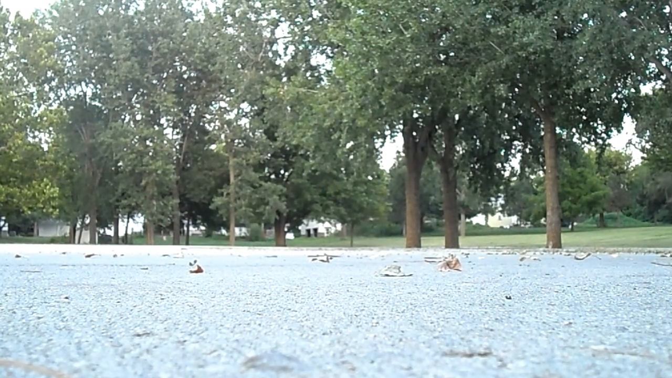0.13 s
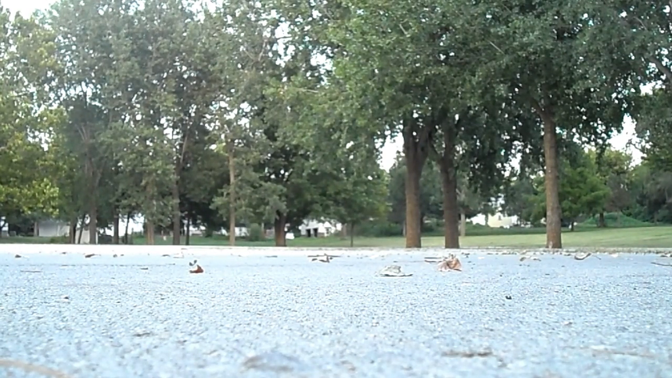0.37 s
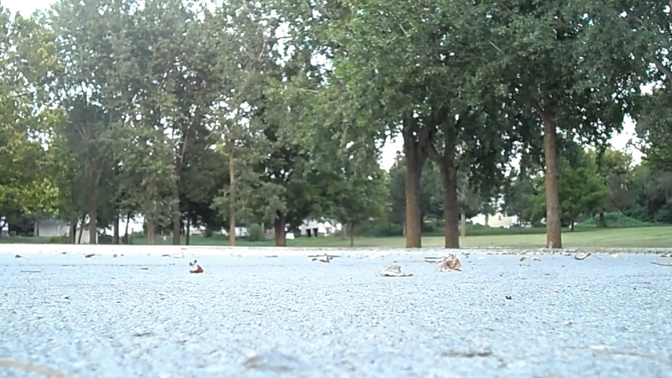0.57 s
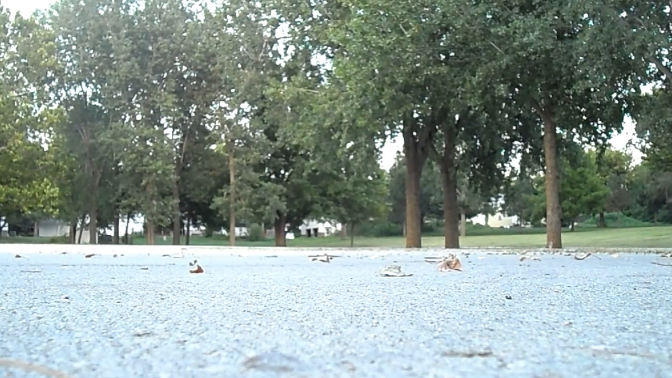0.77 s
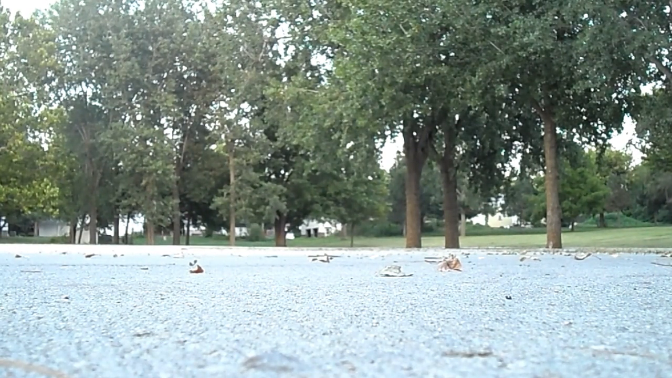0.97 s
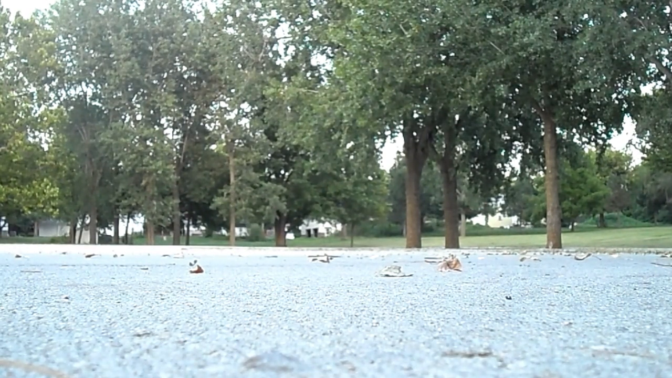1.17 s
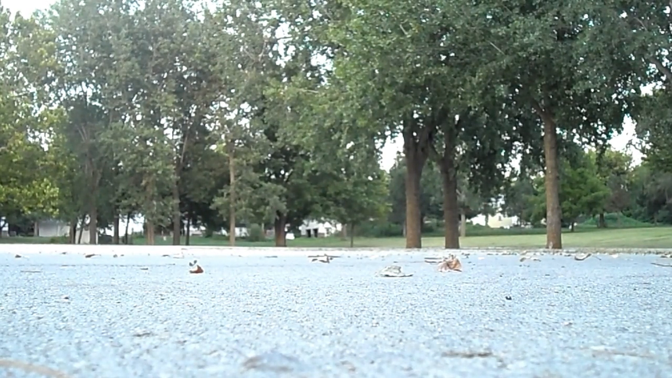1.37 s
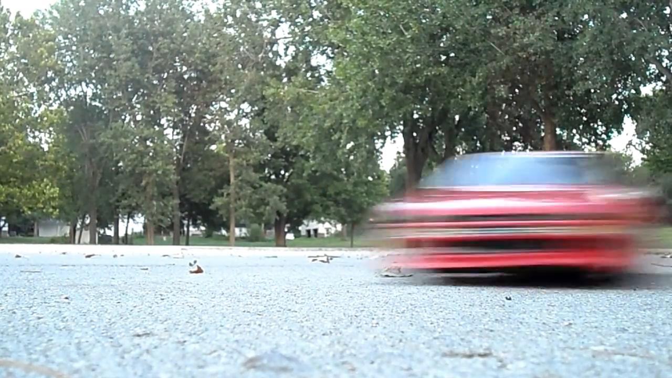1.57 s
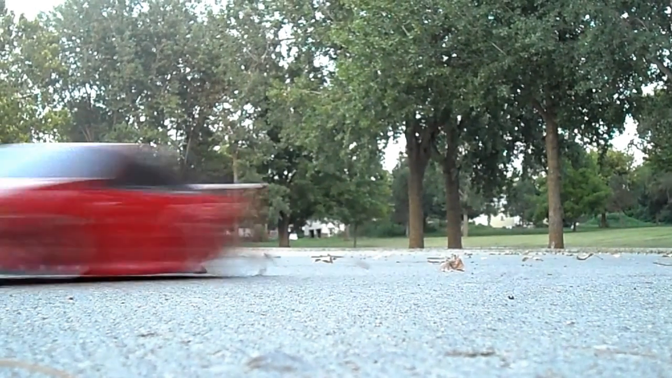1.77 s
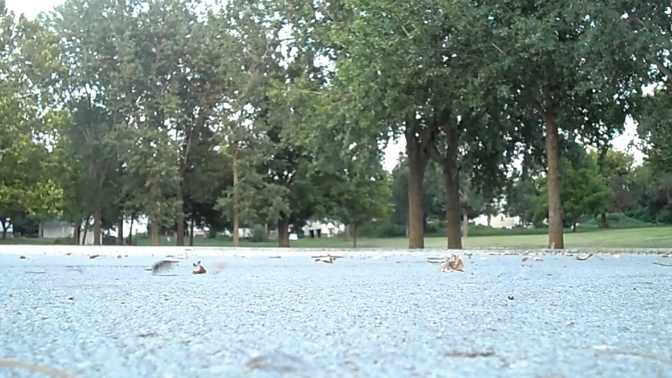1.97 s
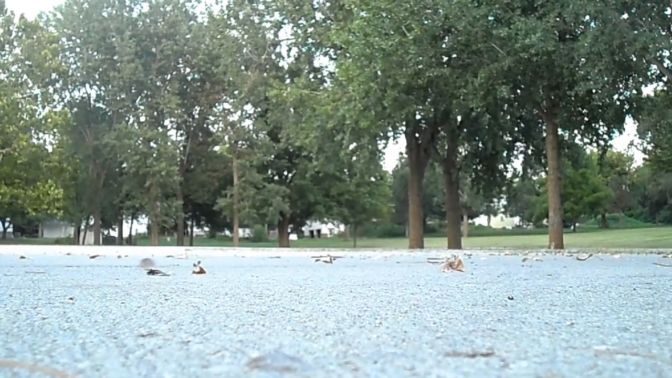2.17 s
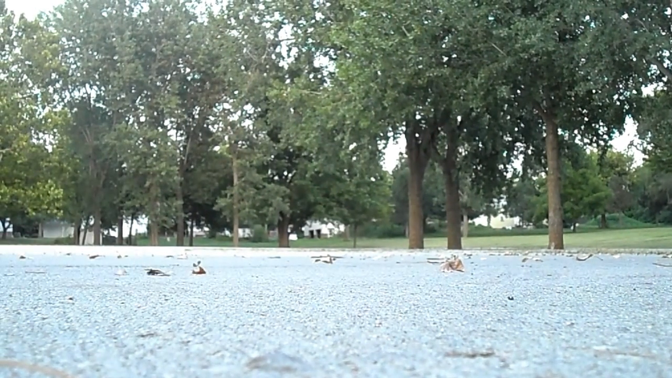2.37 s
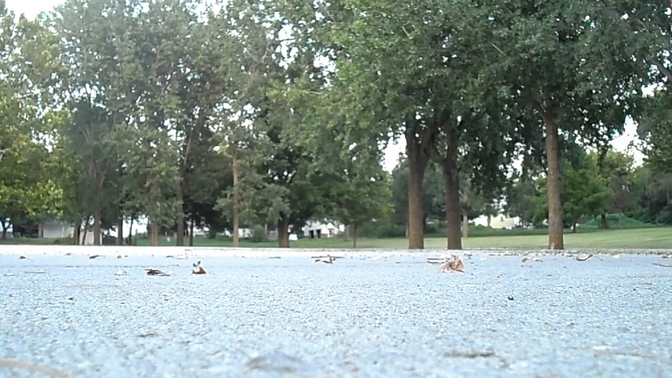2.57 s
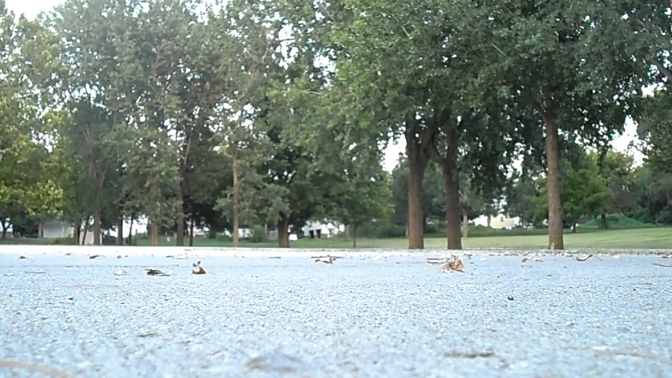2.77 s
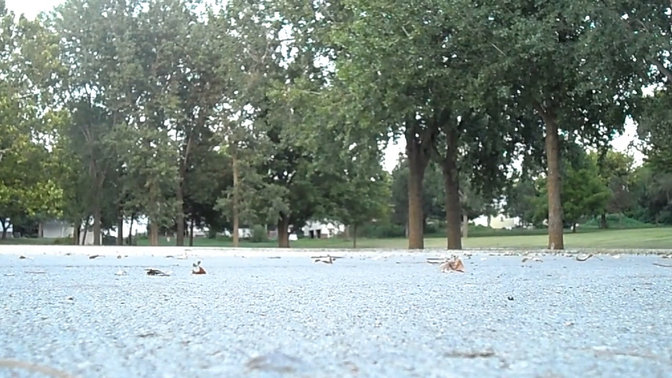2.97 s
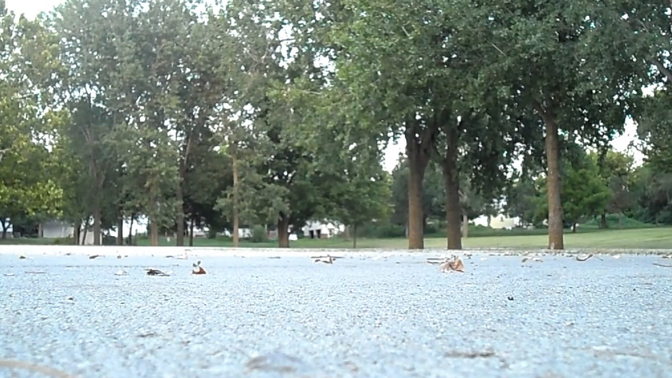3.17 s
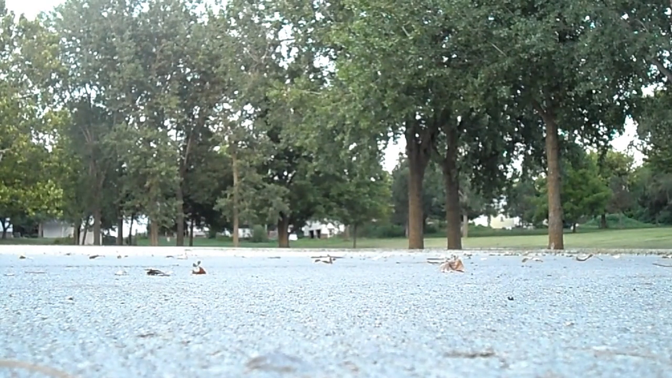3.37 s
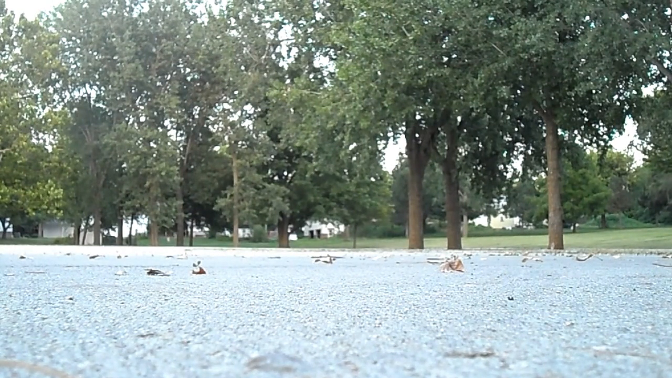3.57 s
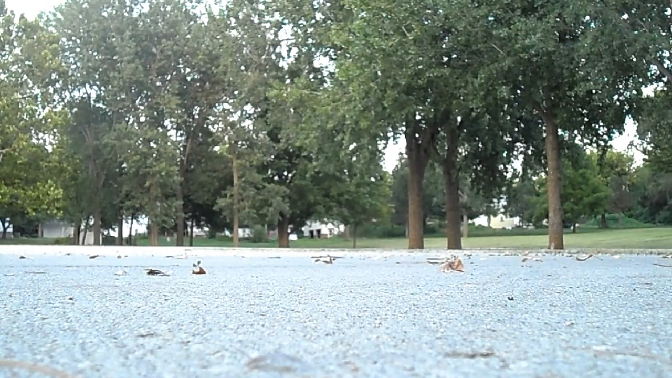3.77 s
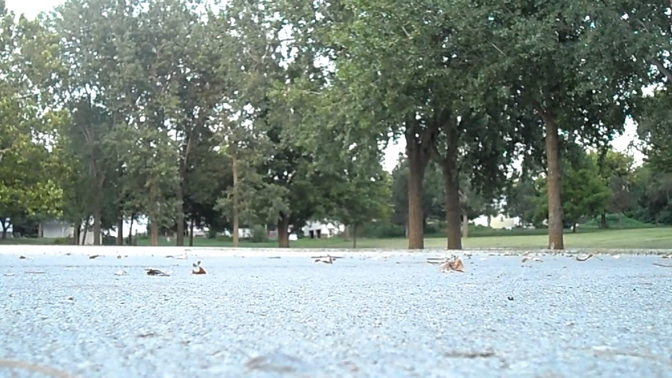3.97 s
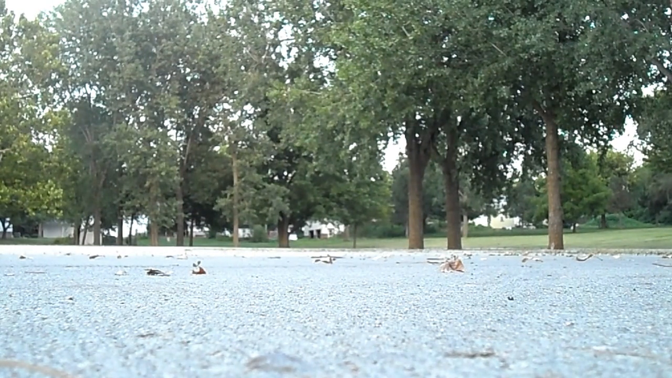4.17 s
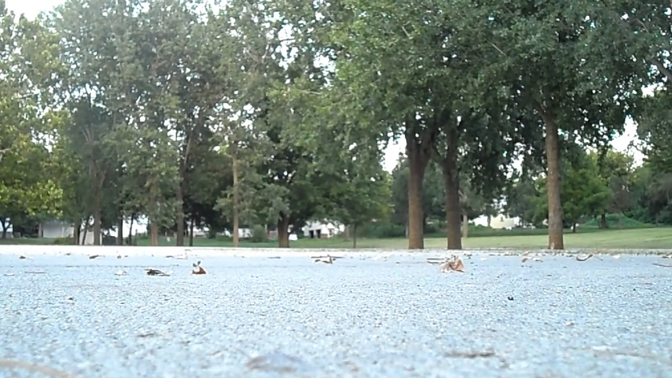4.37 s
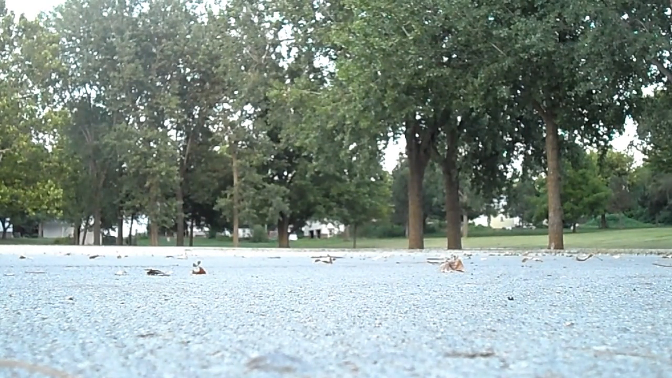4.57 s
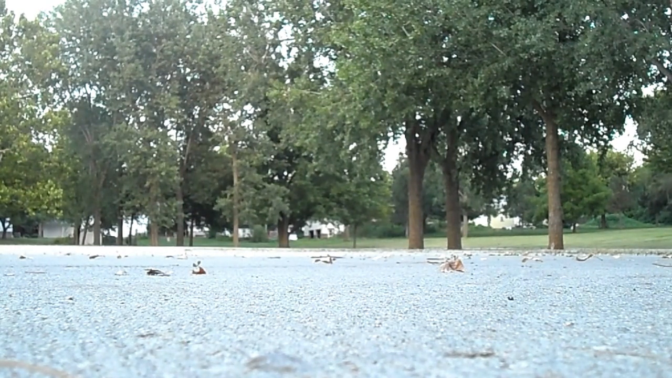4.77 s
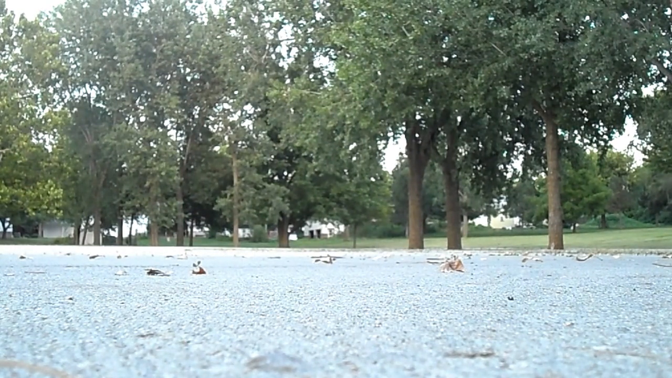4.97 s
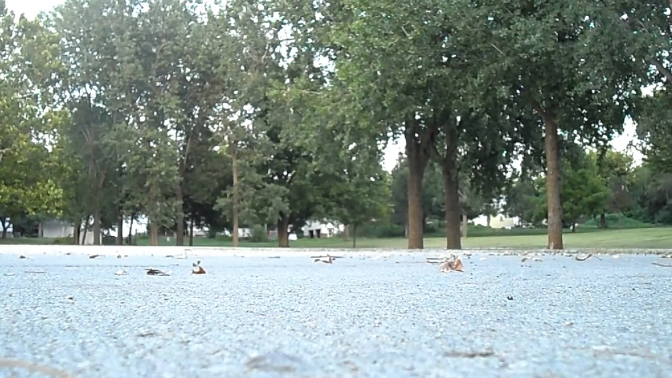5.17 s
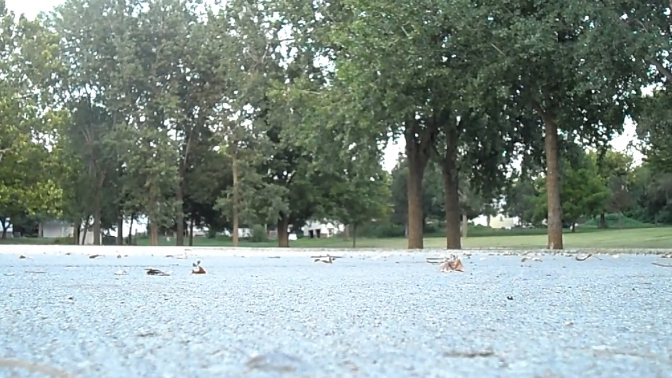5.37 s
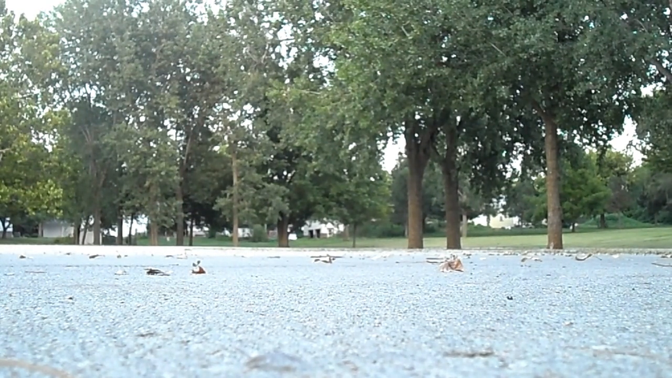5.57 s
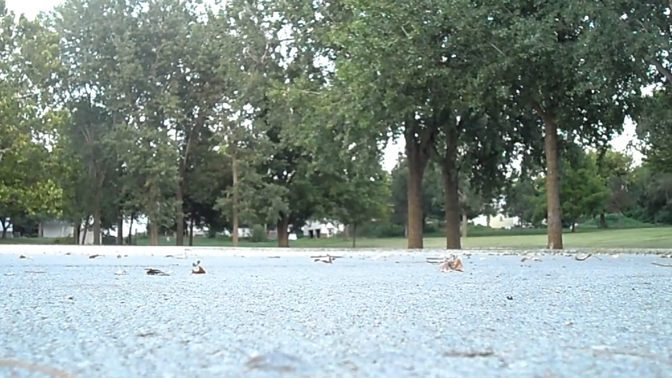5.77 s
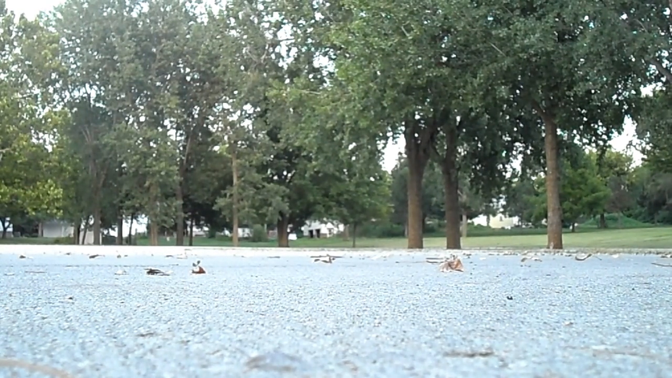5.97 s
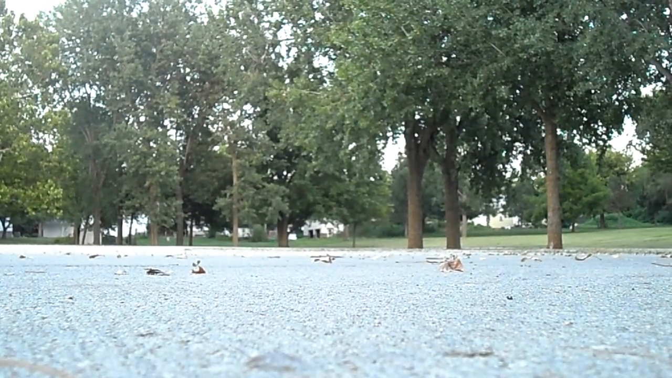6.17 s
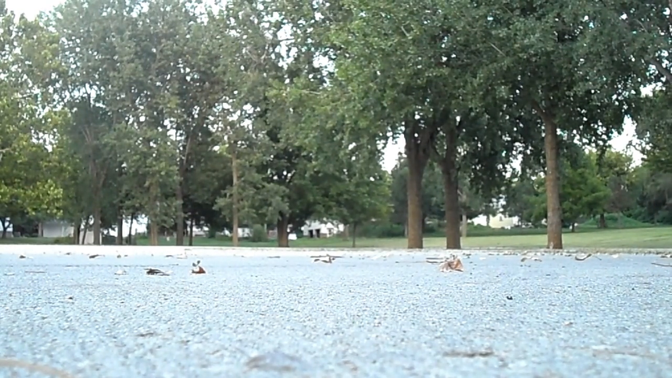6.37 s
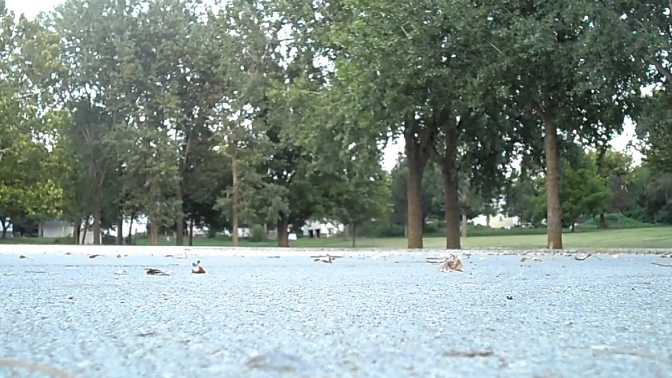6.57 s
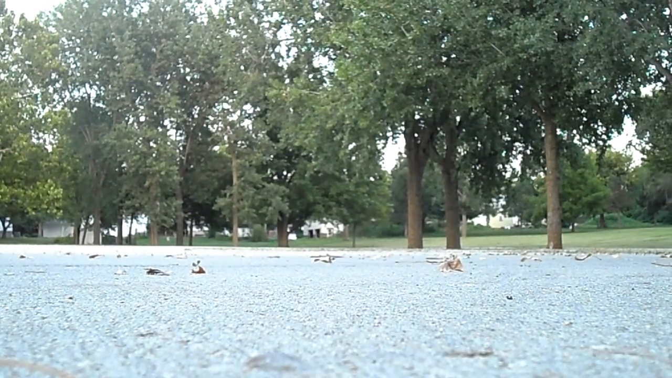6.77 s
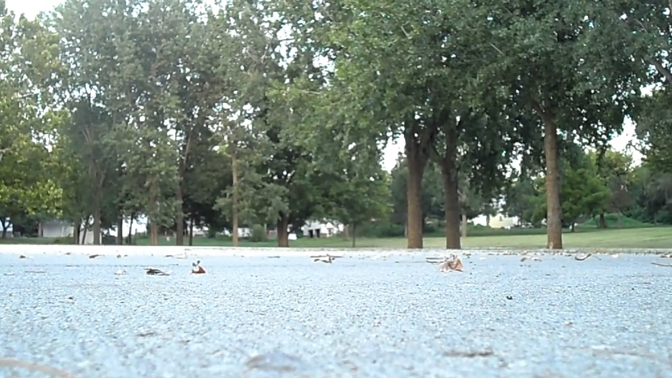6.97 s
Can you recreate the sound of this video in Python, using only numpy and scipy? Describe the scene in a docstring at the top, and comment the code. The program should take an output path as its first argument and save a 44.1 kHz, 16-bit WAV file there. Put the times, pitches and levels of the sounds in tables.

```python
"""On rough outdoor paving a small electric model car runs up, passes close to the ground-level listener and drives off.
Its gear whine is stacked sines, throbbing once a turn of an off-centre gear, over a fainter axle whine.
Shaped noise makes the tyre hiss, random clicks make the grit, and resonances make the body hum and knock.
Underneath lie a bed of coloured noise for far traffic and leaves, soft bass ticks and a faint low hum."""
import sys
import numpy as np
from scipy import signal
from scipy.fft import rfft, irfft
from scipy.io import wavfile

SR = 44100
rng = np.random.default_rng(int(sys.argv[2]) if len(sys.argv) > 2 else 0)


def wav_out(sig):
    """Save sig, one row per channel (or a flat mono array), as 16-bit PCM at SR to the path in sys.argv[1]."""
    wavfile.write(sys.argv[1], SR, np.round(np.clip(np.atleast_2d(sig).T, -1, 1) * 32767).astype(np.int16))


N = 310023

# Outdoor floor colour. Each row: frequency in Hz, spectral level in dB.
AIR_COLOUR = [(12, -32), (20, -2), (80, 1), (250, -7), (1070, -19), (2500, -15), (6000, -22.5),
              (11000, -28), (15500, -50)]
AIR_DB = -49
# Bouts of bass ticks. Each row: start in seconds, end in seconds.
TICK_BOUTS = [(0, 1.41), (1.75, 3.04), (3.47, 4.9), (5.37, 6.55), (6.9, 7.1)]
# Steps that tick, counted from 0 in a loop of 15.
TICK_STEPS = (0, 3, 5, 6, 9, 11, 12, 14)
STEP_S, FIRST_STEP_S = 1 / 30, .02

# Motion of the drive. Each row: time in seconds, gear teeth meeting per second in Hz before hops,
# first-order whine in dB before throb, how hard the off-centre gear binds (0 free, 1 hard).
DRIVE = [(0, 4090, -37.5, 0.5), (.2, 3995, -36, 0.3), (.42, 4075, -38, 0.52), (.5, 3958, -37, 0.77),
         (.59, 4044, -34, 0.36), (.66, 3950, -36.5, 0.95), (.77, 3937, -31.5, 0.65), (.88, 4014, -32, 0.77),
         (1.0, 4146, -34, 0.57), (1.14, 4194, -39, 0.62), (1.29, 4256, -38, 0.52), (1.36, 4030, -33, 0.57),
         (1.45, 3966, -25, 0.69), (1.53, 3994, -28, 0.7), (1.61, 4138, -26, 0.75), (1.67, 3970, -29.5, 1),
         (1.73, 4087, -27.5, 0.39), (1.8, 4140, -23.5, 0.3), (1.9, 4063, -22, 0.54),
         (2.0, 3955, -22.5, 0.77), (2.07, 3873, -27.5, 0.91), (2.13, 3792, -33, 0.98),
         (2.2, 3766, -31, 0.9), (2.24, 3683, -24, 1.08), (2.31, 3616, -34, 1.08), (2.36, 3560, -35.5, 1.0),
         (2.47, 3970, -33.5, 0.43), (2.55, 4100, -39, 0.46), (2.6, 4240, -44, .48), (2.66, 4370, -44, 0.43),
         (2.75, 4450, -42, 0.42), (2.82, 4420, -40, 0.48), (2.87, 4380, -37.5, .4), (2.94, 4310, -42, 0.5),
         (3.0, 4290, -44, 0.62), (3.4, 4204, -49.5, 0.56), (3.57, 4320, -48, 0.68), (3.7, 4073, -49, 0.64),
         (3.92, 3956, -41, 0.77), (4.1, 3656, -48, 0.95), (4.25, 3780, -52, 0.66), (4.33, 4050, -47, 0.62),
         (4.42, 4114, -53, 0.42), (4.52, 4150, -48, 0.5), (4.58, 4115, -54, 0.48), (4.67, 4250, -50, 0.58),
         (4.8, 4280, -56, 0.23), (5.0, 4025, -52.5, 0.65), (5.08, 4090, -52.5, 0.54),
         (5.18, 3990, -51.5, 0.8), (5.35, 4130, -52.5, 0.47), (5.6, 4050, -51, 0.49),
         (5.85, 3934, -49.5, 0.44), (5.95, 4115, -50, 0.56), (6.04, 3990, -52, 0.58),
         (6.12, 4140, -52, 0.44), (6.17, 4150, -51.5, 0.5), (6.23, 3930, -50, 0.88), (6.35, 4040, -53, 0.7),
         (6.48, 4100, -53, 0.6), (6.55, 4080, -56, 0.56), (6.66, 3940, -57, 0.7), (6.8, 4015, -50, 0.75),
         (7.03, 4140, -48, 0.55)]
# Wheels hop and spin up. Each row: landing in seconds, extra mesh rate in Hz, time in the air in seconds,
# settling time in seconds.
HOPS = [(2.8, 540, .04, .028), (2.918, 450, .02, .02), (3.53, 400, .035, .028), (4.482, 560, .01, .012)]
# Offset of the throb against the tooth count. Each row: time in seconds, turns early.
THROB_LEAD = [(1.75, .03), (1.95, -.27), (2.4, -.27), (4.1, -.15), (5.1, 0), (5.75, .15), (6.3, .5),
              (7.03, 1.45)]
SPUR_TEETH, START_TURN = 83, 0.463
HOP_HUSH_DB_PER_KHZ = -9.5  # tyres and unloaded gears fall quiet in the air
HOP_BITE_DB_PER_KHZ = 4  # the first order gains with the extra mesh rate
HUSH_ONSET_S = .008

# Floor pan dragging on the ground. Each row: start in seconds, length in seconds, level in dB.
SCUFFS = [(2.672, 0.04, -33), (2.707, 0.075, -33), (2.788, 0.063, -36.5), (3.216, 0.031, -42),
          (3.468, 0.1, -43)]
# Colour of the floor pan. Each row: frequency in Hz, spectral level in dB.
PAN_COLOUR = [(100, -12), (250, -0.5), (520, 2), (900, -4), (2000, -7.5), (4000, -11), (9000, -48)]
# Body slaps on bumps. Each row: time in seconds, ring gain in dB, crack gain in dB, top of the crack in Hz.
KNOCKS = [(2.683, -33, -19, 6960), (2.805, -30, -18, 3990), (2.812, -30, -17, 4000),
          (2.821, -43, -23, 11980), (3.191, -28.5, -39, 3030), (3.204, -50, -25, 13900),
          (3.4435, -24.5, -16, 8280), (3.481, -17.5, -32, 13000), (3.4919, -22, -19, 5690),
          (3.517, -44, -26, 5040), (3.527, -31, -24.5, 6000)]
# Ringing body modes. Each row: frequency in Hz, gain in dB, 60 dB decay in seconds.
BODY_MODES = [(900, -16, .03), (1310, 0, .03), (1520, -7, .025), (2500, -18, .015), (4200, -20, .015)]

# Tyre hiss along the pass. Each row: time in seconds, base level in dB, lift of the low band in dB,
# lift of the middle band in dB.
ROLL = [(0.0, -47, 0, 2.5), (0.58, -45.5, -1, 2.2), (.95, -43, 1.5, 2), (1.31, -39, 3.5, 0.5),
        (1.51, -36.5, 0, -0.5), (1.76, -36, 1, 0.5), (1.919, -36, 0, 2.5), (2.21, -37.5, -3, 0.5),
        (2.371, -39, 4, 1), (2.65, -41.5, 5.5, 0), (3.01, -44.5, -5, -3.5), (3.35, -47, -3, -3),
        (3.91, -52, -9, 0.2), (4.2, -53, 4.5, 0), (4.48, -51.5, 6.5, -1.5), (4.75, -54.5, 2, -2.5),
        (5.31, -58, -6, -0.5), (5.83, -57, -1, -1), (6.77, -59, 6, 2.5), (7.03, -56, 5, 3)]
# Tyre colour. Each row: frequency in Hz, spectral level in dB.
TYRE_COLOUR = [(350, -32), (600, -14.5), (1000, -7), (1930, -9.5), (3300, -0.5), (5660, -4.5),
               (9500, -10.5), (13000, -12), (15500, -36)]
# Low band lifted along the pass. Each row: frequency in Hz, gain in dB.
LOW_BAND = [(480, -40), (620, 0), (1200, 0), (1400, -40)]
# Middle band lifted along the pass. Each row: frequency in Hz, gain in dB.
MID_BAND = [(1700, -40), (2000, 0), (3300, 0), (3700, -40)]
# Chassis resonances in the hiss. Each row: frequency in Hz, width in Hz, relative gain in dB.
CHASSIS_MODES = [(1678, 50, -8.5), (1900, 193, -7), (2174, 160, -20), (2740, 390, -31.5), (6970, 1700, -24)]
# Body boom resonances. Each row: frequency in Hz, width in Hz, relative gain in dB.
BOOM_MODES = [(387, 44, 1), (474, 43, 6.5), (353, 790, -4.5)]
# Main shell resonances. Each row: frequency in Hz, width in Hz, relative gain in dB.
SHELL_MODES = [(1422, 156, 15), (1330, 47, -4)]
# Upper shell resonances. Each row: frequency in Hz, width in Hz, relative gain in dB.
SHELL_UPPER_MODES = [(1587, 190, 2.5), (2200, 73, 4)]
# Spells of shell hum. Each row: start in seconds, end in seconds, first level in dB, last level in dB,
# upper modes against the main one in dB.
HUM_SPELLS = [(0, .3, -53, -56, -2), (0.337, 0.654, -50, -46, -7), (1.636, 1.716, -40, -52, -9),
              (2.004, 2.262, -35.5, -33, -22), (2.792, 3.184, -43.5, -50.5, -2.5),
              (3.208, 4.107, -50, -49.5, -8.5), (4.64, 5.786, -55, -60, -21)]
# Sprays of grit. Each row: time in seconds, half length in seconds, level in dB before the grit makeup.
SPRAYS = [(2.33, 0.02, -49), (2.588, 0.013, -44), (2.821, 0.021, -47.5), (2.916, 0.021, -53),
          (3.206, 0.0019, -43.5), (4.096, 0.0093, -59), (4.215, 0.01, -58), (4.243, 0.0052, -54),
          (4.374, 0.0038, -64), (4.484, 0.018, -65), (5.546, 0.018, -71), (6.488, 0.0055, -64)]
NEAR_DB = -35  # hiss base level that stands for the closest point
GRIT_NEAR_DB, GRIT_FADES = -39, 1.77  # before makeup; dB lost per dB of hiss: distance dulls grit faster
BOOM_NEAR_DB, BOOM_FADES = -40.5, 1
BOOM_UNDER_HUM_DB = -17.5  # the body also booms along with each hum spell
HUM_RISE_S, HUM_FALL_S = 0.015, 0.048
HUM_REST_DB = -15.5  # constant hum, against the hiss base level

# Brief lower band of song: start in seconds, length in seconds, frequency in Hz, level in dB.
STREAK = (2.15, .1, 2930, -35.5)
STREAK_WIDTH_HZ = 120
# Axle whine. Each row: time in seconds, level in dB.
AXLE = [(0, -62), (.9, -56), (1.1, -43), (1.3, -52), (1.7, -45), (2.05, -45), (2.25, -37), (2.4, -56),
        (2.92, -52), (2.95, -43), (3.03, -54), (3.3, -48), (3.5, -53), (3.7, -51), (3.9, -66), (4.5, -62),
        (4.6, -60), (5.2, -76), (7.03, -80)]
AXLE_RATIO, AXLE_SMEAR_HZ, AXLE_SECOND_DB = .855, 45, -5
# Voicing of the main whine. Each row: time in seconds, first-order throb in dB at full bind,
# lift of the second order in dB.
VOICING = [(0, 6.5, 2), (.9, 5.5, 2.5), (1.25, 4, -0.5), (1.45, 11, -0.5), (1.6, 5, 2.5), (1.78, 10, 3.5),
           (1.95, 6, 7.5), (2.3, 8, 2.5), (2.5, 5, -0.5), (2.8, 3, -1.5), (3.8, 7, 0), (4.1, 4, 0),
           (4.35, 9, -0.5), (5.1, 4, -1), (5.6, 9, -0.5), (6.3, 5, 1.5), (6.75, 5.5, -1.5), (7.03, 10, 1)]
# Gear housing resonances. Each row: frequency in Hz, width in Hz, gain in dB.
GEARBOX_MODES = [(4023, 51, -12), (3785, 74, -2)]
UPPER_FREE_DB, UPPER_PER_BIND_DB = -9.5, 14  # second order over the hiss base: grows as the gear binds
THIRD_FADES = 0.26  # extra dB lost by the third order per dB of hiss
CUTOFF_HZ = 16010


def amp(db):
    """Gain of a level in dB."""
    return 10 ** (np.asarray(db) / 20)


def unit(x):
    """Scaled to rms 1."""
    return x / np.sqrt(np.mean(x ** 2) + 1e-20)


def clock():
    """Time of every sample in seconds."""
    return np.arange(N) / SR


def in_time(rows):
    """Columns of a time curve, interpolated to one value a sample."""
    s, *columns = np.transpose(rows)
    return [np.interp(clock(), s, column) for column in columns]


def drift(rate):
    """Smoothed random wandering of rms 1, low-passed at about rate in Hz."""
    r = np.exp(-2 * np.pi * rate / SR)
    noise = rng.standard_normal(N + SR)
    return unit(signal.lfilter([1], [1, -2 * r, r * r], noise)[SR:])  # drop the run-in


def coloured(x, spectrum):
    """x with its spectrum shaped by (Hz, dB) points on a log frequency axis."""
    hz, db = np.transpose(spectrum)
    bins = np.log(np.fft.rfftfreq(N, 1 / SR) + 1)
    return irfft(rfft(x) * amp(np.interp(bins, np.log(hz), db)), N)


def resonate(x, modes):
    """Parallel two-pole resonances of (Hz, width Hz, dB)."""
    out = 0
    for hz, width, db in modes:
        r = np.exp(-np.pi * width / SR)
        poles = [1, -2 * r * np.cos(2 * np.pi * hz / SR), r * r]
        out = out + amp(db) * signal.lfilter([(1 - r * r) / 2, 0, (r * r - 1) / 2], poles, x)
    return out


def grains(per_s, spread_db):
    """Random clicks of uneven size, rms 1."""
    sizes = amp(spread_db * np.minimum(rng.exponential(1, N), 5)) * rng.choice([-1, 1], N)
    return unit(sizes * (rng.random(N) < per_s / SR))


def air():
    """Far traffic and leaves blend into steady noise weighted to the bass."""
    return amp(AIR_DB) * unit(coloured(rng.standard_normal(N), AIR_COLOUR))


def bass_ticks(dip_db=-38.5, width_s=0.00293, hum_hz=88, hum_db=-63.5):
    """Soft downward bell-shaped pulses on a looped rhythm, and a faint narrow hum."""
    steps = np.arange(int(N / SR / STEP_S))
    at = FIRST_STEP_S + steps * STEP_S + rng.normal(0, 0.0011, len(steps))
    in_bout = np.any([(at > a) & (at < b) for a, b in TICK_BOUTS], axis=0)
    ticking = np.isin(steps % 15, TICK_STEPS) & in_bout
    clicks = np.zeros(N)
    clicks[(at * SR).astype(int)] = ticking * amp(dip_db + rng.normal(0, 1.5, len(steps)))
    t = np.arange(-.03 * SR, 0.0314 * SR) / SR
    dips = -signal.fftconvolve(clicks, np.exp(-.5 * (t / width_s) ** 2), "same")
    hum = unit(resonate(rng.standard_normal(N), [(hum_hz, 6, 0)]))
    return dips + amp(hum_db) * hum


def hop():
    """Extra mesh rate in Hz: it climbs while the wheels are in the air and settles after landing."""
    t, extra = clock(), 0
    for s, hz, air_s, settle_s in HOPS:
        climb = np.clip(1 + (t - s) / air_s, 0, 1)
        extra = extra + hz * climb * np.exp(-np.maximum(t - s, 0) / settle_s)
    return extra


def hush_db():
    """Level change in dB as the wheels lift, ending at the landing."""
    t, change = clock(), 0
    for s, hz, air_s, _ in HOPS:
        lifted = np.clip((t - s + air_s) / HUSH_ONSET_S + 1, 0, 1) * (t < s)
        change = change + HOP_HUSH_DB_PER_KHZ * hz / 1000 * lifted
    return change


def mesh():
    """Teeth meeting per second, hops included."""
    return in_time(DRIVE)[0] + hop()


def spur_angle():
    """Angle of the big gear in radians, counted from its tightest mesh."""
    return 2 * np.pi * (START_TURN + in_time(THROB_LEAD)[0] + np.cumsum(mesh()) / SR / SPUR_TEETH)


def scuffs():
    """Rough dragging: dense grains through the broad low colour of the pan."""
    t, drag = clock(), 0
    for s, length, db in SCUFFS:
        drag = drag + amp(db) * np.sin(np.pi * np.clip((t - s) / length, 0, 1)) ** 0.51
    return np.nan_to_num(drag) * unit(coloured(grains(3500, 1.6), PAN_COLOUR))


def knocks(crack_s=0.0034, contact_s=0.00035):
    """Each slap rings the body modes afresh and adds a short crack; rubber and plastic soften the start."""
    out, t = np.zeros(N), np.arange(int(.06 * SR)) / SR
    for s, ring_db, crack_db, top_hz in KNOCKS:
        ring = 0
        for hz, level_db, t60 in BODY_MODES:
            decay_db = level_db + rng.normal(0, 1.5) - 60 * t / t60
            ring = ring + amp(decay_db) * np.sin(2 * np.pi * hz * t)
        crack = rng.standard_normal(len(t)) * np.exp(-t / crack_s)
        crack = signal.sosfilt(signal.butter(3, [1100, top_hz], "band", fs=SR, output="sos"), crack)
        slap = amp(ring_db) * ring + amp(crack_db) * crack
        out[round(s * SR):][:len(t)] += slap * (1 - np.exp(-t / contact_s))
    return out


def hum_spells(upper=0):
    """Gain of the shell's hum, or of its upper modes: rise, slope, fall."""
    t, gain = clock(), 0
    for a, b, first_db, last_db, upper_db in HUM_SPELLS:
        level_db = np.interp(t, [a, b], [first_db, last_db]) + upper * upper_db
        edges = np.exp(np.minimum(t - a, 0) / HUM_RISE_S - np.maximum(t - b, 0) / HUM_FALL_S)
        gain = gain + amp(level_db) * edges
    return gain


def shell_hum(hiss_db):
    """Grains ring the plastic shell, shaken by the gear's throb a little late; upper modes join in spells."""
    main = unit(resonate(resonate(grains(4000, 2.7), SHELL_MODES), SHELL_MODES))
    main = main * (hum_spells() + amp(hiss_db + HUM_REST_DB)) * amp(2.3 * np.cos(spur_angle() - .8))
    upper = unit(resonate(resonate(grains(2500, 2.2), SHELL_UPPER_MODES), SHELL_UPPER_MODES))
    return main + upper * hum_spells(upper=1)


def boom(loss_db):
    """Noise through low body resonances, following the hiss and the hum spells."""
    gain = amp(BOOM_NEAR_DB + BOOM_FADES * loss_db) + amp(BOOM_UNDER_HUM_DB) * hum_spells()
    return unit(resonate(rng.standard_normal(N), BOOM_MODES)) * gain


def sprays():
    """Gain of the short grit showers."""
    t = clock()
    return sum(amp(db) * np.exp(-.5 * ((t - s) / half) ** 2) for s, half, db in SPRAYS)


def grit(loss_db):
    """Loose grit: dense bright clicks that fade fast with distance, plus showers."""
    clicks = coloured(grains(16000, 5.1), [(9000, 4.5), (14000, 0.5), (15800, -8.5)])
    clicks = signal.sosfilt(signal.butter(2, 8500, "high", fs=SR, output="sos"), clicks)
    gain = amp(GRIT_NEAR_DB + GRIT_FADES * loss_db) + sprays()
    return clicks * gain * amp(13.0)  # makeup


def tyre_hiss(hiss_db):
    """Tyres on a coarse surface: noise and grains excite chassis modes that come and go."""
    road = rng.standard_normal(N) + .5 * grains(5000, 0.42)
    modes = sum(amp(1.8 * drift(19.0)) * resonate(road, [mode]) for mode in CHASSIS_MODES)
    tyres = unit(coloured(road + 5.56 * modes, TYRE_COLOUR))
    _, low_db, mid_db = in_time(ROLL)
    tyres = tyres + (amp(low_db) - 1) * coloured(tyres, LOW_BAND) \
        + (amp(mid_db) - 1) * coloured(tyres, MID_BAND)
    return tyres * amp(hiss_db + 6.5 + 0.97 * np.cos(spur_angle()))  # makeup, and a throb with the gear


def rolling():
    """Uneven ground sways hiss, grit and boom together, while the shell hums on its own."""
    hiss_db = in_time(ROLL)[0] + hush_db()
    loss_db = hiss_db - NEAR_DB
    bumps = amp(1.3 * drift(39))
    return bumps * (tyre_hiss(hiss_db) + grit(loss_db) + boom(loss_db)) + shell_hum(hiss_db)


def streak():
    """A lower band sings briefly as the car pulls away: narrow noise that swells and fades."""
    s, length, hz, db = STREAK
    band = [(hz, STREAK_WIDTH_HZ, 0)]
    swell = np.sin(np.pi * np.clip((clock() - s) / length, 0, 1))
    return amp(db) * swell * unit(resonate(resonate(rng.standard_normal(N), band), band))


def axle():
    """A fainter pair of gears whines below the main one; tooth play blurs each order into a narrow band."""
    teeth = 2 * np.pi * np.cumsum(AXLE_RATIO * mesh()) / SR
    first, second = [drift(AXLE_SMEAR_HZ * k) * np.sin(k * teeth)
                     + drift(AXLE_SMEAR_HZ * k) * np.cos(k * teeth) for k in (1, 2)]
    return amp(in_time(AXLE)[0] + hush_db()) * (first + amp(AXLE_SECOND_DB) * second)


def gears(loud_lead=0.17, third_db=-4.5, sag=.048, jitter=0.006, wander=.003):
    """An off-centre gear binds once a turn: teeth get loud while the motor is slowed, then it runs free."""
    _, first_db, load = in_time(DRIVE)
    first_throb_db, lift_db = in_time(VOICING)
    roll_db, hush = in_time(ROLL)[0], hush_db()
    first_db = first_db + HOP_BITE_DB_PER_KHZ * hop() / 1000 + 2 * hush
    second_db = roll_db + 2 * hush + UPPER_FREE_DB + UPPER_PER_BIND_DB * load + lift_db
    third_db = second_db + third_db + THIRD_FADES * (roll_db - NEAR_DB)

    bind = np.minimum(load * amp(1.5 * drift(25)), 1.1)
    angle = spur_angle()
    phase = angle + .4
    slowing = np.sin(phase) + .25 * np.sin(2 * phase)  # quick fall through the tight spot, slower recovery
    slip = jitter * drift(53.0) + wander * drift(10.12)  # wheels slip and grip
    hz = mesh() * (1 - sag * bind ** 2 * slowing + slip)
    teeth = 2 * np.pi * np.cumsum(hz) / SR
    uneven_db = 0.84 * drift(75)  # no two turns bind alike

    # each order: level dB, throb dB at full bind, tooth play in radians, slow patchiness dB
    orders = [(first_db, first_throb_db, .3, 1.2), (second_db, 10.0, .35, 3.0), (third_db, 8.0, .5, 2.4)]
    out = 0
    for k, (db, depth_db, play, patch_db) in enumerate(orders, 1):
        throb_db = depth_db * bind * (np.cos(angle + loud_lead) - .6)
        flicker_db = uneven_db + 3.23 * drift(186) + patch_db * drift(25)
        timing = (play + 0.27 * bind) * drift(280)  # worn teeth land early or late
        out = out + np.sqrt(2) * amp(db + throb_db + flicker_db) * np.sin(k * teeth + timing)
    return out + resonate(out, GEARBOX_MODES)


def scene():
    """The car with a diffuse scatter from trees and kerb, over the outdoor floor and bass ticks."""
    car = gears() + axle() + rolling() + knocks() + scuffs() + streak()
    t = np.arange(int(.3 * SR)) / SR
    scatter = rng.standard_normal(len(t)) * amp(-60 * t / 0.13) * (t > .004)
    echo = amp(-14.0) * signal.fftconvolve(car, scatter / np.linalg.norm(scatter))[:N]
    return (car + echo + air() + bass_ticks())[None]


def record(dry):
    """The microphone drops the deepest bass; the top is cut steeply."""
    dry = signal.sosfilt(signal.butter(1, 9.0, "high", fs=SR, output="sos"), dry)
    return signal.sosfilt(signal.cheby2(22, 70, CUTOFF_HZ, fs=SR, output="sos"), dry)


dry = scene()
out = record(dry)
wav_out(out)
```